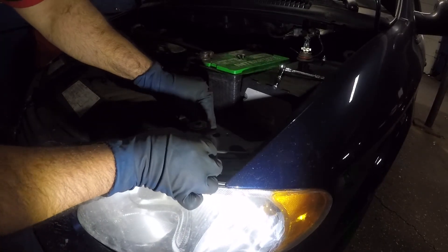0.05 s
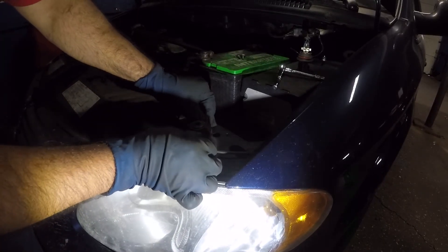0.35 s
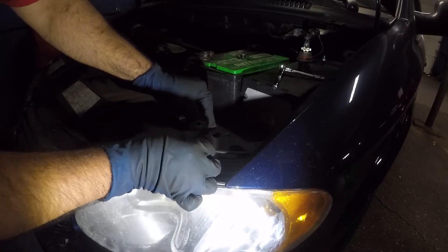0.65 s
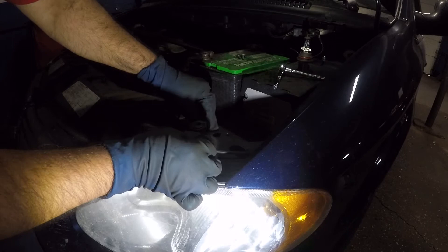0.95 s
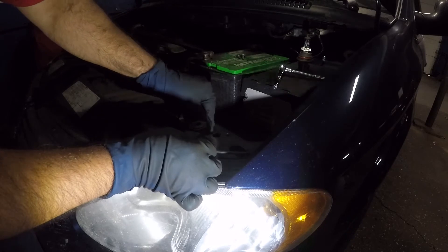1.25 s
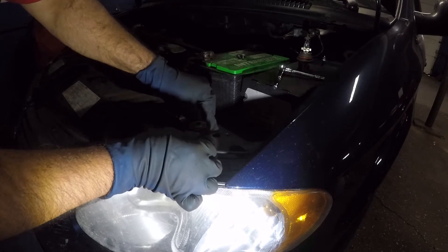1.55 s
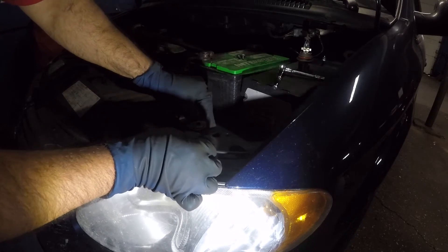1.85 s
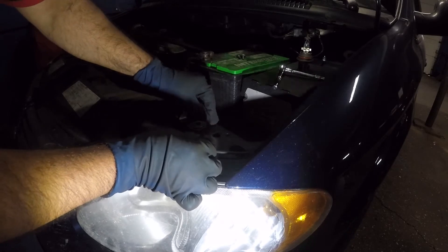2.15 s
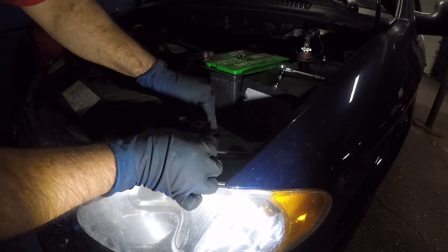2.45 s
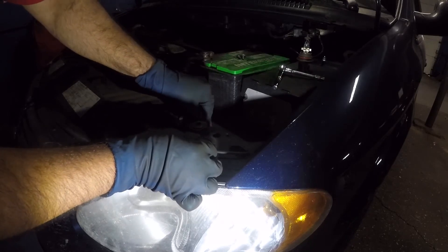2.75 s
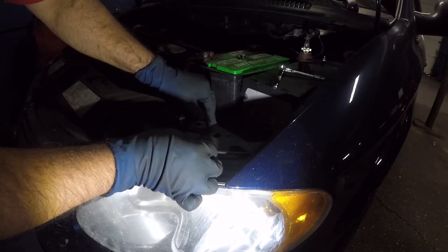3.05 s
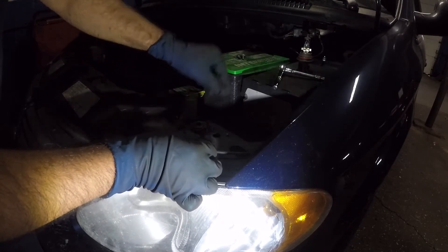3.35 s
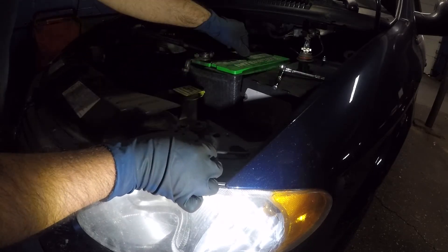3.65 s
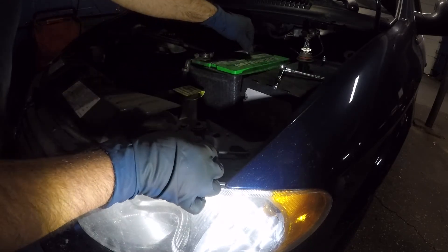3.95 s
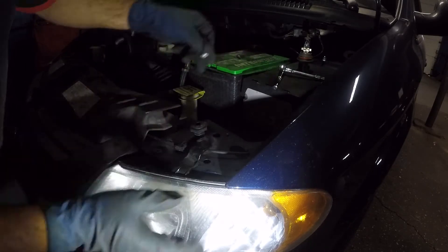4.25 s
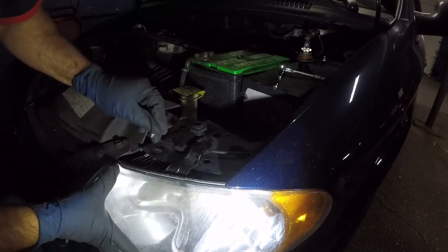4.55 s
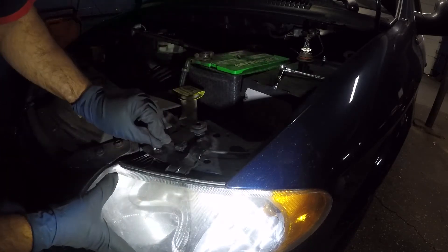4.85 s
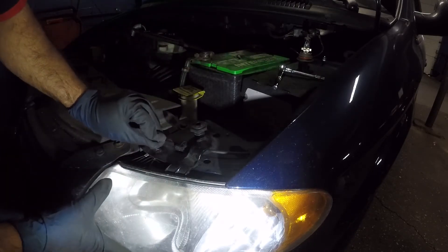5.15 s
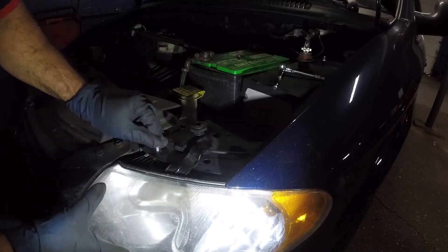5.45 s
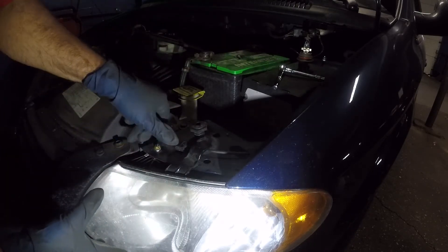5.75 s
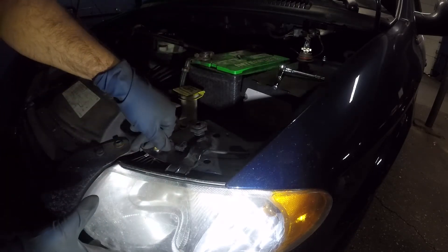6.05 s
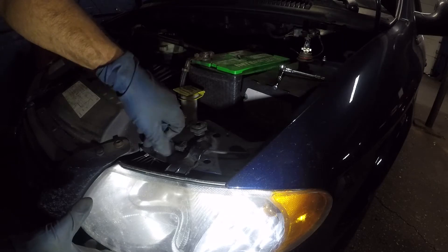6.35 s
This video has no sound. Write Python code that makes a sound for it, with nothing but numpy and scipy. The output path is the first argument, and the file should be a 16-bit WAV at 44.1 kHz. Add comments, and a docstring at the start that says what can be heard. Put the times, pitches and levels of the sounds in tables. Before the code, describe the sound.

In the first second, a plastic headlight housing is pushed into place close by, with a quick run of hollow thumps, sharp knocks and gritty rubbing. From about 1 to 3 seconds, screws tick lightly and scratch as gloved fingers turn them, with more plastic bumps around 1.6, 2, 2.5 and 2.9 seconds. A clip snaps with one bright crack at 3.2 seconds. After a quieter moment, the lens gives a hollow ringing knock at 4.1 seconds, with soft sliding. A metal part clinks at 4.8 seconds, then rattles from 5.2 to 5.5, with its loudest clank near 5.4. Another ringing plastic knock lands at 5.7 seconds, and a short scuff, tap and tick follow around 6.2. Each blow has a short echo, over dull workshop air and a faint, wavering low drone.

```python
"""Hollow thumps and creaks come first: gloved hands seat a plastic headlight housing under a car's bonnet.
Screws tick in their holes as they are started, a clip snaps home, and later a loose metal part
rattles and clanks. Each blow rings a few clear modes over a dense, fast-dying wash.
Gloves and sliding plastic add gritty friction, the engine bay and walls ring on after each blow,
and steady workshop air with a low, wandering drone lies under it all."""
import sys
import numpy as np
from scipy import signal
from scipy.fft import rfft, irfft
from scipy.io import wavfile

SR = 44100
rng = np.random.default_rng(int(sys.argv[2]) if len(sys.argv) > 2 else 0)


def transcribe(signal):
    """Save signal, clipped to [-1, 1], as a 16-bit WAV file at the path in sys.argv[1]."""
    frames = np.atleast_2d(signal).T
    limited = np.clip(frames, -1, 1)
    pcm = np.round(limited * 32767).astype(np.int16)
    wavfile.write(sys.argv[1], SR, pcm)


N = 286650
HZ = np.fft.rfftfreq(4096, 1 / SR)  # frequency grid of the EQ curves


def amp(db):
    return 10 ** (np.asarray(db) / 20)


def unit_rms(x):
    return x / np.sqrt(np.mean(x ** 2) + 1e-20)


def curve(points, hz=HZ):
    """Joins (frequency, value) points on a log-frequency axis."""
    f, value = np.transpose(points)
    return np.interp(np.log(hz + 1), np.log(f + 1), value)


def band(hz, octaves, order):
    """Band-pass EQ curve in dB, 3 dB down at `octaves` either side of hz."""
    return -10 * np.log10(1 + (np.log2((HZ + 1) / hz) / octaves) ** order)


def eq(x, db):
    """Minimum-phase EQ with gains db on the HZ grid: nothing rings ahead of an attack."""
    log_gain = np.log(amp(np.maximum(db, db.max() - 80)))
    mirrored = np.concatenate([log_gain, log_gain[-2:0:-1]])
    response = np.exp(signal.hilbert(mirrored).conj())
    taps = irfft(response[:len(HZ)])
    return signal.fftconvolve(x, taps[None], axes=1)[:, :x.shape[1]]


def add(mix, time, sound):
    part = mix[:, round(time * SR):][:, :sound.shape[1]]
    part += sound[:, :part.shape[1]]


def wash(t60s, size):
    """Countless modes blurred into noise, each band dying at its own speed; rows are mid and side."""
    hz, t, spectrum = signal.stft(rng.choice([-1., 1.], (2, size)), SR, nperseg=128)
    t60 = curve(t60s, hz)[:, None]
    spectrum = spectrum * amp(-60 * t / t60) * np.sqrt(np.log(1e6) / (t60 * SR))
    return signal.istft(spectrum, nperseg=128)[1][:, :size]


def ringing(modes, size, scatter_db):
    """The clear modes of a body; each point of contact weights them differently."""
    hz, db, t60 = np.transpose(modes)[:, :, None]
    t = np.arange(size) / SR
    resonance = amp(db + scatter_db * rng.standard_normal(hz.shape))
    weight = resonance * np.log(1e6) / (t60 * SR)
    return (weight * amp(-60 * t / t60) * np.sin(2 * np.pi * hz * t)).sum(0)


def friction(grain_db, per_s):
    """A fine hiss of tiny slips with some larger catches among them."""
    caught = rng.random(N) < per_s / SR
    catches = caught * amp(grain_db * np.minimum(rng.exponential(1, N), 3.5))
    return unit_rms(rng.standard_normal((2, N)) + rng.choice([-1, 1], (2, N)) * unit_rms(catches))


def add_stroke(mix, grit, peak_s, half_s, db, tone_db):
    """One rubbing stroke: filtered grit swells and fades in a bell curve."""
    t = np.arange(N) / SR - peak_s
    near = abs(t) < 3 * half_s
    swell = np.exp(-(t[near] / half_s) ** 2)
    mix[:, near] += amp(db) * unit_rms(eq(grit[:, near], tone_db)) * swell


def wall_flex(hz, t):
    """A struck plastic wall swings a few times and stops: a dead thud that peaks after one cycle."""
    cycles = hz * t
    return 2 * hz / SR * cycles * np.exp(-cycles) * np.sin(2 * np.pi * cycles)


# blows on the housing: (time [s], hard knock [dB], thump of the push [dB], contact [s], wall pitch [Hz])
KNOCKS = [(0.125, 14, 27.5, 0.0059, 227), (0.134, 11.5, 26.5, 0.01, 300), (0.178, -2, 21.5, 0.0052, 230),
          (0.2413, 19, -22, 0.0008, 1340), (0.248, 13.5, 12, 0.0048, 1030), (0.2636, 19, 21, 0.00052, 381),
          (.425, -29.5, 16, 0.0078, 230), (0.516, -5, 22.5, 0.0016, 186), (0.639, 14, 18.5, 0.0016, 460),
          (0.657, 5, 25, 0.0024, 237), (0.704, -15.5, 27, 0.0018, 222), (0.782, 7.5, 3, 0.00044, 460),
          (0.884, -6, 6, 0.001, 216), (1.583, 0, 18.5, 0.00084, 262), (1.597, 0.5, 9.5, 0.0014, 304),
          (1.614, 7.5, -6, 0.0047, 900), (1.7055, 0.5, 0, 0.00083, 260), (1.739, 2.5, 19.5, 0.013, 380),
          (1.9833, 14, 6.5, 0.00029, 937), (2.016, 2, -3, 0.001, 900), (2.13, -12, 8.5, 0.00032, 285),
          (2.2288, -4.5, 12, 0.00027, 290), (2.46, 11.5, 13, 0.0018, 670), (2.78, -0.5, 6, 0.0019, 465),
          (2.883, 3.5, 13.5, 0.0061, 430), (3.113, 1.5, -1.5, 0.00083, 310), (3.191, 4.5, 4.5, 0.005, 525),
          (3.697, -10, 2.5, 0.002, 178), (4.111, 6, 2.5, 0.0079, 490), (4.481, -4, 11, 0.0036, 273),
          (5.302, -26, 12.5, 0.0027, 253), (5.327, -45, 15.5, 0.0027, 180), (5.472, -13, 15.5, 0.0031, 510),
          (5.721, 7, -11, 0.003, 980), (5.7433, 15, 12, 0.0019, 492), (6.265, 9.5, -6, 0.0058, 540)]
# clear modes of the housing: (frequency [Hz], resonance [dB], t60 [s])
HOUSING_MODES = [(170, -10, .2), (225, -5, .2), (244, -7, .18), (338, -4.5, .2), (387, -9, .12),
                 (443, -3.5, .17), (521, -9, .15), (667, -8, .12), (830, -13, .1), (893, -10, .15),
                 (955, -8, .15), (1071, -8, .12), (1200, -8, .12), (1448, -7, .12), (1780, -6, .15)]
# decay of its crowded modes: (frequency [Hz], t60 [s])
HOUSING_T60 = [(200, 0.13), (800, 0.12), (2500, 0.13), (8000, 0.089)]
# tone of a hard contact: (frequency [Hz], gain [dB])
KNOCK_EQ = [(230, 1), (500, -1), (1000, -1), (2000, -16), (4300, -24), (7000, -27), (10000, -35),
            (14000, -57)]
def housing_knocks():
    """The housing slips into place in short judders, each of which rings the hollow plastic."""
    out = np.zeros((2, N))
    t = np.arange(16384) / SR
    thump_hz, knock_hz = 202, 844  # the push rules below the first, the contact above the second
    for time, knock_db, thump_db, contact_s, wall_hz in KNOCKS:
        body = eq(wash(HOUSING_T60, t.size), curve([(150, -4), (450, 3.5), (800, 3.5)]))
        body[0] += amp(13.5) * ringing(HOUSING_MODES, t.size, scatter_db=1.5)
        body *= 1 - np.exp(-t / contact_s)  # a long contact softens the attack
        # only a brief contact has a thud and a sharp front
        body[0] += amp(10) * np.exp(-contact_s / .0026) * wall_flex(wall_hz, t)
        body[0, 0] += .6 * np.exp(-contact_s / .006)
        # longer, softer knocks get more treble to stay bright
        brightness_db = 5.5 * np.log2(contact_s / .003) * curve([(2500, .076), (7000, .75)])
        blow_db = curve([(thump_hz, thump_db), (knock_hz, knock_db)]) + curve(KNOCK_EQ) + brightness_db
        add(out, time, eq(body, blow_db + curve([(150, -5), (230, 0)])))
    return out


# hits that ring the lens: (time [s], level [dB])
LENS_HITS = [(4.113, 24), (5.744, 27)]
# modes of the lens: (frequency [Hz], resonance [dB], t60 [s])
LENS_MODES = [(390, -7, .17), (522, 0, .27), (600, -10, .15), (802, -11, .15), (950, -11, .14),
              (1025, -11, .14), (1550, -9, .12)]
def lens_rings():
    """The hollow lens rings as the glove peels off it, and again when the housing is bumped."""
    out = np.zeros((2, N))
    for time, db in LENS_HITS:
        ring = ringing(LENS_MODES, size=22050, scatter_db=.5)
        add(out, time, amp(db) * np.array([ring, .3 * ring]))
    return out


# screws ticking in their holes or against each other:
# (time [s], steel head [dB], plastic seat [dB], seat pitch [Hz], seat half width [octaves], rattle [dB])
TICKS = [(0.2408, -22, 13.5, 1580, 0.32, -0.5), (0.2473, 7, 10, 1610, 0.38, 0),
         (0.2505, 8.5, 1, 1700, .31, -2.5), (0.8991, 1.5, -2.5, 7250, 0.57, -6),
         (0.904, -30, 2, 1500, 0.35, 4), (1.017, -42.5, 2, 1450, 0.19, 0.5),
         (1.389, -11.5, 0.5, 1470, 0.47, 1.5), (1.422, -33, 3, 1410, 0.26, -2.5),
         (1.505, -15.5, -17, 1500, 0.28, -4), (1.7054, -20, 1.5, 1500, 0.32, -3.5),
         (1.985, -19, -6.5, 3500, 0.17, 1.5), (2.03, -20, -13, 2820, .4, -3),
         (2.4611, -7, 5.5, 2010, 0.3, -3), (2.609, -29, -12, 3080, 0.32, -7),
         (2.6323, -19, -15, 3120, .3, -4), (2.779, -17, -13, 3200, .4, 0),
         (2.8942, -2.5, -4.5, 2760, 0.35, -11.5), (2.994, -19, -14, 3180, 0.23, -1),
         (3.0628, -23, -23, 3200, .3, -3), (3.175, -11, -6.5, 3000, 0.66, -4),
         (3.395, -16, -1.5, 2150, 0.14, -7), (3.6909, -32, -4, 2250, 0.44, -10),
         (4.113, -6.5, -12, 3200, 0.37, -5), (4.1225, -16, -20, 3200, .4, -13),
         (4.211, -16.5, -18, 4900, 0.18, -0.5), (4.6928, -16, -0.5, 2630, 0.54, -8.5),
         (4.7748, 0, 6.5, 4370, 0.2, 2.5), (5.080, -20, -21, 3030, 0.28, -3),
         (5.328, -10, -16, 2515, .31, -6), (5.744, -3.5, 4, 2700, 0.56, -4), (6.319, -19, 6, 1760, .14, -9)]
# decay of the rattle: (frequency [Hz], t60 [s])
SCREW_T60 = [(1500, 0.13), (3000, 0.1), (10000, 0.063)]
# thin ring of a screw: (frequency [Hz], resonance [dB], t60 [s])
SCREW_MODES = [(5900, 1, .18), (6050, 1, .26), (6280, 4, .32)]
# tone of the steel head: (frequency [Hz], gain [dB])
HEAD_EQ = [(1000, -14), (3000, -2), (4500, -8), (6300, 2.5), (9000, -8), (12000, -13.5), (14000, -36)]
def screw_ticks():
    """A hard click and a tiny rattle: the steel head sounds high, its plastic seat answers in one band."""
    out = np.zeros((2, N))
    for time, head_db, seat_db, seat_hz, seat_octaves, rattle_db in TICKS:
        click = amp(rattle_db) * wash(SCREW_T60, size=12288)
        click[0] += amp(-1.5) * ringing(SCREW_MODES, size=12288, scatter_db=1.5)
        click[0, 0] += .65  # sharp front
        head = amp(head_db + curve(HEAD_EQ))
        seat = amp(seat_db + band(seat_hz, seat_octaves, order=4))
        add(out, time, eq(click, 20 * np.log10(np.hypot(head, seat))))
    return out


# the loose metal part rattles, strikes and settles:
# (time [s], level [dB], bass [dB], treble [dB], low ring [dB], high ring [dB], reverb send [dB])
CLANKS = [(4.775, 11, -6, -1, 7, 2, -0.5), (5.169, 1, -5, -10, 14.5, 15, -1),
          (5.2244, 4.5, -2, 0.5, 15.5, 14, -2), (5.2636, 9.5, -5, -15, 12, 6, -4),
          (5.284, 12.5, -16, -15, 10.5, 5, -3.5), (5.3008, 11.5, -5.5, -8, 8, 8, -3),
          (5.320, 3, -12, -10, 0, -2, -1), (5.424, 6, -1.5, 8, 5, 8, 2), (5.426, 19.5, 1.5, 8, 5, 9, 0.5),
          (5.478, -2, 9, 1, 7, 10, 1), (5.501, 2.5, 4, 3, 5, 11.5, 2)]
# clear modes of the part: (frequency [Hz], resonance [dB], t60 [s])
METAL_MODES = [(942, -2, .14), (1020, -1, .2), (1233, -3, .1), (1450, 0, .22), (1534, -1, .16),
               (1863, -3, .12), (2025, 2, .24), (2460, 1, .22), (2649, -4, .1), (2794, -2, .1),
               (3284, 0, .15), (3642, 0, .15), (4081, -2, .1), (4425, -3, .06), (4492, -1, .08),
               (4680, -3, .1), (5650, -4, .06), (5850, -6, .06), (5950, -7, .09), (6502, -2, .16),
               (6560, -1, .12), (6604, 2, .26), (6700, -5, .12), (7494, -6, .09), (8400, 0, .08),
               (9030, -1, .09), (10080, -5, .07), (10750, -3, .08), (13150, 1, .1)]
# decay of its crash: (frequency [Hz], t60 [s])
METAL_T60 = [(500, 0.21), (2000, 0.1), (6000, 0.057), (12000, 0.11)]
# tone of a clank: (frequency [Hz], gain [dB])
CLANK_EQ = [(150, -1), (600, -1), (1000, 0), (2000, -2), (3000, -7), (4500, -8.5), (5200, -12.5),
            (5800, -4.5), (6600, -5), (9000, -14.5), (11000, -20), (14000, -38)]
def metal_clanks():
    """Metal on metal: a dense crash with clinking modes. Returns the sound and its reverb send."""
    out, send = np.zeros((2, 2, N))
    t = np.arange(16384) / SR
    for time, db, bass_db, treble_db, low_ring_db, high_ring_db, send_db in CLANKS:
        crash = wash(METAL_T60, t.size)
        ring = ringing(METAL_MODES, t.size, scatter_db=1.5)
        crash[:1] += eq(ring[None], curve([(4700, low_ring_db), (5800, high_ring_db)]))
        crash *= 1 - np.exp(-t / .00069)  # fast attack
        crash[0, 0] += amp(-14.5)  # the bite of first contact
        hardness_db = curve([(600, bass_db), (1000, 0), (4000, 0), (9000, treble_db)])
        clank = amp(db) * eq(crash, curve(CLANK_EQ) + hardness_db)
        add(out, time, clank)
        add(send, time, amp(send_db) * clank)
    return out, send


CLIP_EQ = [(300, -5), (700, 6), (1650, -10), (2400, -.5), (3100, -4), (4200, -13.5), (5500, 2), (6300, -1),
           (7500, -2), (8800, -10), (11000, -4), (13600, -6.5), (15000, -25)]
# decay of its crack: (frequency [Hz], t60 [s])
CLIP_T60 = [(700, 0.061), (2500, 0.012), (12000, 0.048)]
def clip_snap(time):
    """A plastic clip snaps home: one bright crack that dies almost at once."""
    out = np.zeros((2, N))
    crack = amp(1.5) * wash(CLIP_T60, size=8192)
    crack[0, 0] += 1  # sharp front
    add(out, time, amp(3.5) * eq(crack, curve(CLIP_EQ)))
    return out


# parts and gloves sliding: (peak time [s], half length [s], level [dB], treble [dB])
SLIDES = [(0.128, 0.033, -33.5, -7), (0.648, 0.015, -39, 20), (1.305, 0.033, -38, -7),
          (1.601, 0.02, -49.5, 10), (2.832, 0.076, -43, 1), (3.251, 0.018, -45.5, 11),
          (4.125, 0.045, -51.5, 19), (4.23, 0.081, -54.5, 11), (4.463, 0.053, -45.5, 5.5),
          (6.17, 0.059, -38.5, -5), (6.184, 0.02, -30.5, 0.5), (6.26, 0.085, -39, -9)]
# tone of a slide: (frequency [Hz], gain [dB])
SLIDE_EQ = [(150, -3), (400, -2), (900, -2.5), (2000, -7), (4000, -16.5), (6500, -15.5), (10000, -24.5),
            (14000, -38)]
def plastic_slides():
    """Short gritty slides of plastic on plastic."""
    out = np.zeros((2, N))
    grit = friction(grain_db=2.5, per_s=2500)
    for peak_s, half_s, db, treble_db in SLIDES:
        tone_db = curve(SLIDE_EQ) + curve([(1000, 0), (6000, treble_db)])
        add_stroke(out, grit, peak_s, half_s, db, tone_db)
    return out


# a screw is twirled in the fingers: (start [s], end [s])
TWIRLS = [(1.05, 1.6), (2.151, 3.1)]
def fingertip_slips(per_s=7.9, db=-55, spread_db=4, half_s=.021, hz=5800):
    """Cues for light slips of the fingertips, uneven in timing and level."""
    times = np.concatenate([np.arange(start, end, 1 / per_s) for start, end in TWIRLS])
    chance = rng.random((len(times), 2))
    return [(time + late / per_s, half_s, db + spread_db * (2 * firm - 1), hz)
            for time, (late, firm) in zip(times, chance)]


# spans of light rustle, from gloves at work and the hissy tail after the big clank:
# (start [s], end [s], level [dB])
RUSTLES = [(0, 1.58, -41), (2.1, 3.4, -46), (4.05, 5.5, -51.5), (5.45, 5.75, -43), (6.1, 7.6, -59)]
# tone of the rustle: (frequency [Hz], gain [dB])
RUSTLE_EQ = [(200, 23), (1200, 3), (2200, 0.5), (3100, 1.5), (4300, -14), (6500, -2.5), (10000, -15),
             (14000, -27)]
# a screw is twisted or rolled: (peak time [s], level [dB], band centre [Hz])
TWISTS = [(1.06, -52.5, 2900), (2.178, -51.5, 2870), (2.624, -48.5, 2880), (2.72, -54, 6950),
          (2.991, -49.5, 2950), (3.084, -49, 3100), (4.09, -51.5, 3100), (4.25, -58, 6700),
          (4.325, -56.5, 7000)]
def rustle_and_twists(idle_db=-89, fade_s=.24, twist_half_s=.032):
    """A light rustle, with a scratchy swell wherever a rubber glove catches and slips on a screw head."""
    t = np.arange(N) / SR
    rustle = unit_rms(eq(friction(grain_db=5, per_s=260), curve(RUSTLE_EQ)))
    level = sum(amp(db) * np.clip(np.minimum(t - start, end - t) / fade_s + .5, 0, 1)
                for start, end, db in RUSTLES)
    out = (amp(idle_db) + level) * rustle
    grit = friction(grain_db=4.5, per_s=700)
    scratch_db = curve([(500, -19), (1500, 6), (8000, -2.5), (14000, -7)])
    twists = [(peak_s, twist_half_s, db, hz) for peak_s, db, hz in TWISTS]
    for peak_s, half_s, db, hz in twists + fingertip_slips():
        add_stroke(out, grit, peak_s, half_s, db, band(hz, octaves=.24, order=2) + scratch_db)
    return out


# reverb time of the surroundings: (frequency [Hz], t60 [s])
REVERB_T60 = [(150, 0.47), (500, 0.72), (1500, 0.71), (4000, 0.6), (7000, 0.51), (13000, 0.48)]
def reverb(send):
    """The engine bay answers after a short gap; the walls around add a later swell."""
    t = np.arange(40960) / SR
    onset = np.clip((t - .006) / .0049, 0, 1)
    swell = .85 + .11 * np.exp(-((t - .085) / .0095) ** 2) + .049 * np.clip(t / .21, 0, 1)
    tone_db = curve([(200, -1.5), (350, -1), (500, 1), (780, -3), (1200, -3), (2000, -4),
                     (6000, -5.5), (12000, -5)])
    tail = eq(wash(REVERB_T60, t.size) * onset * swell, tone_db)
    return signal.fftconvolve(send[:1], tail, axes=1)[:, :N]


# tone of the workshop air: (frequency [Hz], gain [dB])
AIR_EQ = [(20, 7.5), (110, 3.5), (165, 1), (260, -3), (500, -11.5), (1200, -9.5), (2000, -21),
          (4000, -27.5), (7000, -27), (10000, -28.5), (14000, -42)]
# path that the drone wanders around: (time [s], pitch [Hz], level [dB])
DRONE = [(0, 151.8, -54), (3.599, 153.1, -67), (3.74, 151.8, -50), (3.86, 169.5, -39.5), (3.97, 159.9, -58),
         (4.2, 146, -41.5), (4.7, 146, -47.5), (4.9, 151.3, -60), (5.2, 151.9, -50), (5.32, 162.8, -39),
         (5.6, 152, -47.5), (6.5, 148, -70)]
def workshop():
    """Dull, steady room tone and a low drone that wavers in level and pitch."""
    t = np.arange(N) / SR
    air = amp(-42.5) * unit_rms(eq(rng.standard_normal((2, N)), curve(AIR_EQ)))
    knots = np.linspace(0, t[-1], 120)
    waver_db = 2.5 * unit_rms(np.interp(t, knots, rng.standard_normal(knots.size)))
    drift_hz = 5 * unit_rms(np.interp(t, knots, rng.standard_normal(knots.size)))
    times, hz, db = np.transpose(DRONE)
    level = amp(np.interp(t, times, db) + waver_db)
    pitch_hz = np.interp(t, times, hz) + drift_hz
    air[0] += level * np.sin(2 * np.pi * np.cumsum(pitch_hz) / SR)
    return air


# stereo width: (frequency [Hz], side gain [dB])
WIDTH = [(150, -10.5), (350, -9), (560, -4), (1000, -5.5), (2500, -5), (6000, -2), (9000, -3.5),
         (13000, -3)]
# stereo balance: (frequency [Hz], left minus right [dB])
BALANCE = [(150, -1), (330, -2), (550, -5.5), (800, -4.5), (1200, -1), (2500, 1), (5000, -2), (8000, -0.5)]
# phase between the channels: (frequency [Hz], left lead [rad])
PHASE_LEAD = [(150, 0.63), (420, -1.2), (650, 1.86), (1300, 1.64), (3000, 0.56), (6000, 0.27),
              (12000, 1.47)]
def stereo(mid_side):
    """Mid and side become left and right: two microphone ports that differ in level and phase."""
    hz = np.fft.rfftfreq(N, 1 / SR)
    mid, side = rfft(mid_side)
    side *= amp(curve(WIDTH, hz))
    port = amp(curve(BALANCE, hz) / 2) * np.exp(.5j * curve(PHASE_LEAD, hz))
    return irfft(np.array([(mid + side) * port, (mid - side) / port]), N)


def scene():
    """The close sounds, each with its own reverb send, over the workshop bed."""
    plastic = housing_knocks() + lens_rings()
    screws = screw_ticks()
    rubs = plastic_slides() + rustle_and_twists()
    clip = clip_snap(time=3.1925)
    metal, metal_send = metal_clanks()
    send = amp(-2.5) * plastic + amp(-4.5) * screws + metal_send + amp(-8) * rubs + amp(-5.5) * clip
    return stereo(plastic + screws + metal + rubs + clip + reverb(send) + workshop())


# low cut against wind: (frequency [Hz], gain [dB])
WIND_FILTER = [(20, -27), (100, -29), (118, -25), (145, -1), (170, -1)]
def record(dry):
    """A steep wind filter under the bass, then a high cut at 15.2 kHz."""
    trimmed = eq(dry, curve(WIND_FILTER))
    high_cut = signal.firwin(255, 15200, window=("kaiser", 9), fs=SR)
    return signal.oaconvolve(trimmed, high_cut[None], "same")


dry = scene()
out = record(dry)
transcribe(out)
```